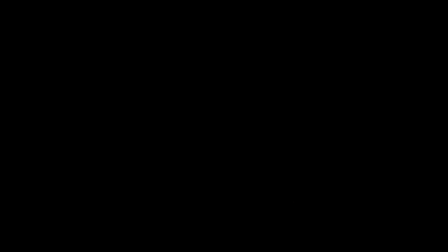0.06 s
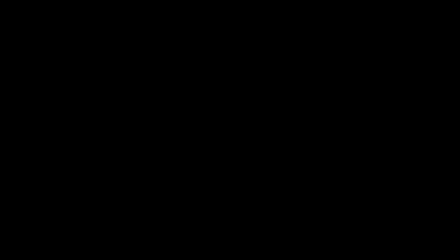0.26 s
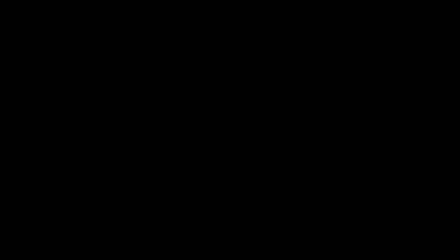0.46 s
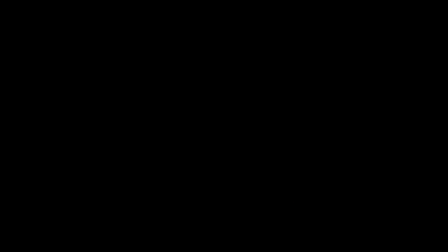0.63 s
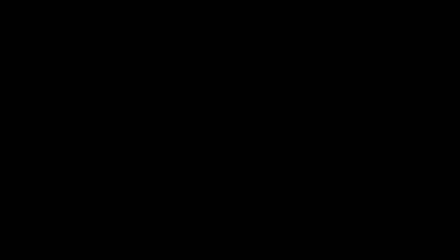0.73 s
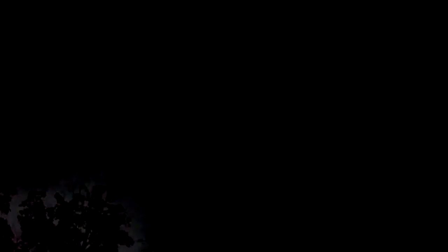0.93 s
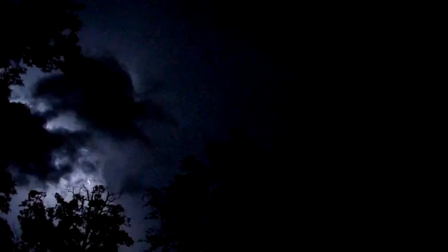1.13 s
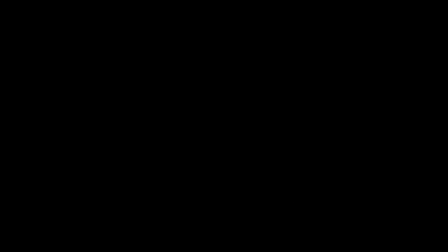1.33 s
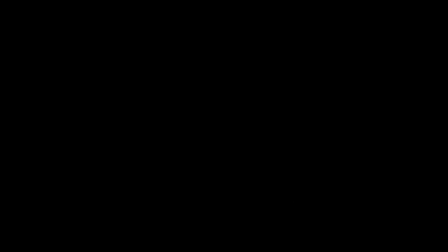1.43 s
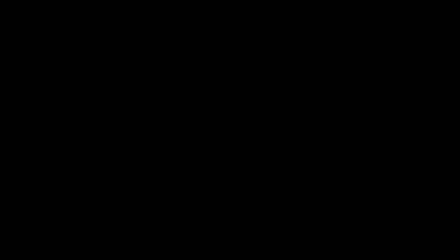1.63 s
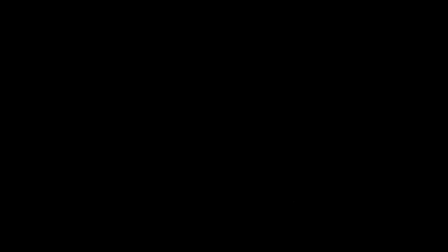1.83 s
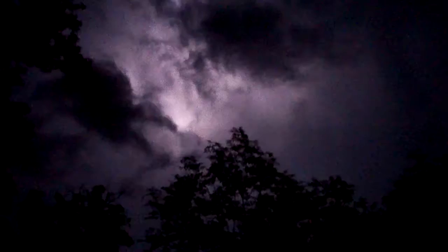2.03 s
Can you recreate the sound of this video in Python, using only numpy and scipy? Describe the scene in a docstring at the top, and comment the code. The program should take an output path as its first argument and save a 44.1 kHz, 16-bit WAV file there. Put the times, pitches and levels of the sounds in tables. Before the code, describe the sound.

Distant thunder rolls outdoors at night, swelling first deep, then slightly brighter, with dull thumps standing out before it fades. A few raindrops land close to the microphone over a thin, steady hiss of far rain.

```python
"""Distant thunder in faint rain

Countless dull pressure waves merge into a rumble that swells twice, first deep, then brighter,
with single thumps standing out. A few drops land close to the microphone and four tiny ticks
pass, over a thin, steady hiss of far rain and a faint hum."""
import sys
import numpy as np
from scipy import signal
from scipy.fft import rfft, irfft
from scipy.io import wavfile
from scipy.ndimage import uniform_filter1d

SR = 44100
rng = np.random.default_rng(int(sys.argv[2]) if len(sys.argv) > 2 else 0)


def int16_out(signal):
    """Quantize to a 16-bit WAV file."""
    q = np.round(np.clip(np.atleast_2d(signal).T, -1, 1) * 32767)
    wavfile.write(sys.argv[1], SR, q.astype(np.int16))


N = 91904
T = np.arange(N) / SR
BINS_HZ = np.arange(N // 2 + 1) * SR / N


def from_db(db):
    return 10 ** (np.asarray(db) / 20)


def unit_rms(x):
    return x / np.sqrt(np.mean(x ** 2) + 1e-20)


def in_time(rows):
    return np.interp(T, *np.transpose(rows))


def low_pass(x, hz):
    return signal.sosfilt(signal.cheby1(14, 0.1, hz, fs=SR, output="sos"), x)


def coloured(x, spectrum):
    """Minimum-phase filter; output rms 1."""
    hz, db = np.transpose(spectrum)
    gain_db = np.interp(np.log(np.maximum(BINS_HZ, 1)), np.log(hz), db)
    cepstrum = irfft(np.log(from_db(gain_db)), N)
    cepstrum[1:N // 2] *= 2
    cepstrum[N // 2 + 1:] = 0
    return unit_rms(irfft(rfft(x) * np.exp(rfft(cepstrum)), N))


def drift(rate_hz):
    """Smooth random wander, rms 1."""
    return unit_rms(irfft(rfft(rng.standard_normal(N)) / (1 + (BINS_HZ / rate_hz) ** 2), N))


def impulses(per_s, spread_db):
    """Random arrivals of either sign."""
    sizes = from_db(spread_db * np.minimum(rng.exponential(1, N), 4))
    return (rng.random(N) < per_s / SR) * sizes * rng.choice([-1, 1], N)


def evened(x, window_samples):
    """Flattens swells slower than the window."""
    power = uniform_filter1d(uniform_filter1d(x ** 2, window_samples), window_samples)
    return x / np.sqrt(power + 1e-12)


def burst(start_s, rise_s, t60_s):
    """Quick rise, exponential fall."""
    age_s = np.maximum(T - start_s, 0)
    return (1 - np.exp(-age_s / rise_s)) * from_db(-60 * age_s / t60_s)


def roll(pivot_hz=185):
    """Waves from all along the lightning channel, dulled by distance; bass and top see-saw."""
    # (time [s], level before tilt [dB])
    swells = [(0, -45), (.07, -49.5), (.115, -40.5), (.17, -45.5), (.31, -52), (.42, -46), (.51, -44.5),
              (.56, -39.5), (.68, -41.5), (.8, -45), (.92, -44.5), (.98, -43), (1.11, -43), (1.29, -40.5),
              (1.42, -40.5), (1.48, -46), (1.66, -43), (1.79, -53), (2.08, -64.5)]
    # (time [s], tilt about the pivot [dB/octave])
    brightness = [(0, 0), (.12, -4.4), (.36, 0.8), (.66, -4), (.9, -.5), (1.25, -0.3), (1.65, -0.6),
                  (2.08, 6.5)]
    # (frequency [Hz], relative level [dB])
    spectrum = [(30, -37.5), (50, -31), (78, -8), (100, -9.5), (120, -2), (148, -9), (185, 2.5), (250, -4),
                (300, -3), (390, -7.5), (500, -17), (700, -24.5), (1200, -46), (2000, -63.5)]
    waves = coloured(impulses(per_s=900, spread_db=2), spectrum)
    wave_bins = rfft(evened(waves, window_samples=1800))
    octaves = np.clip(np.log2(np.maximum(BINS_HZ, 1) / pivot_hz), -2, 2)
    tilt_db = in_time(brightness)
    rumble = np.zeros(N)
    for octave in range(-2, 3):
        band = irfft(wave_bins * np.maximum(1 - abs(octaves - octave), 0), N)
        rumble += band * from_db(tilt_db * octave)
    return from_db(in_time(swells)) * rumble


def thumps(echo_db=-17.5, echo_t60_s=0.07):
    """N-shaped pressure waves, rounded by distance and trailed by scattered echoes."""
    # (time [s], peak [dB], 1 / N-wave length [Hz])
    arrivals = [(0.105, -46, 87.6), (.126, -37, 175), (.539, -28.5, 160), (0.564, -36, 188),
                (0.618, -26, 190), (.633, -28, 132), (.655, -34.5, 118), (.674, -29.5, 172),
                (.702, -33.5, 169), (.729, -30.5, 98.8), (.740, -35, 84.3), (.970, -35.5, 199),
                (1.030, -32, 133), (1.167, -41.5, 236), (1.264, -36.5, 172), (1.281, -28, 170),
                (1.297, -31.5, 215), (1.387, -36.5, 192), (1.404, -32, 190), (1.442, -36.5, 151)]
    # loss to distance and ground: (frequency [Hz], relative gain [dB])
    path_gain = [(25, -30), (50, -24.5), (80, -2), (190, 3), (320, 3.5), (430, -5.5), (600, -21.5),
                 (1200, -36.5), (2500, -58.5)]
    out = np.zeros(N)
    for start_s, peak_db, hz in arrivals:
        n_wave = (1 - 2 * T * hz) * (T * hz < 1)
        rounded = coloured(n_wave, path_gain)[:N // 20]
        echo_decay = (T > start_s) * from_db(echo_db - 60 * abs(T - start_s) / echo_t60_s)
        paths = impulses(per_s=200, spread_db=0) * echo_decay
        paths[int(start_s * SR)] = 1  # direct path
        out += from_db(peak_db) * signal.oaconvolve(paths, rounded / abs(rounded).max())[:N]
    return out


def drops(grains_per_s=5600):
    """Each near drop lands with a dull pat and a shorter, bright splash."""
    # (time [s], pat level [dB], splash level [dB], rise [s])
    landings = [(.321, -53.5, -78, .002), (.351, -46, -51, 0.00086), (0.364, -57, -70, 0.0018),
                (0.474, -48.5, -60, .005), (0.609, -73, -55, 0.0024), (.627, -69, -59, .002),
                (0.646, -63, -62, .002), (1.438, -49.5, -66, 0.004), (1.6244, -45.5, -53, .0004),
                (1.986, -73, -55, .002), (1.999, -72, -61.5, 0.0024), (2.054, -54, -68, 0.0027)]
    # both: (frequency [Hz], relative level [dB])
    pat_spectrum = [(250, -4), (600, 5.5), (1000, 4), (1600, -0.5), (2800, -8.5), (4000, -22),
                    (5500, -45.5)]
    splash_spectrum = [(3500, -35.5), (4400, -15), (5300, 2.5), (6800, 7), (8200, -4.5), (9600, -17)]
    pat_envelope, splash_envelope = np.zeros((2, N))
    for start_s, pat_db, splash_db, rise_s in landings:
        pat_envelope += from_db(pat_db) * burst(start_s, rise_s, t60_s=0.092)
        splash_envelope += from_db(splash_db) * burst(start_s, rise_s, t60_s=0.057)
    pat = pat_envelope * coloured(impulses(grains_per_s, spread_db=0.85), pat_spectrum)
    splash = splash_envelope * coloured(impulses(grains_per_s, spread_db=0.73), splash_spectrum)
    return pat + splash


def ticks(band_hz=(6860, 8200), rise_s=0.00078, t60_s=0.012):
    """Four tiny, thin ticks in quick succession."""
    # (time [s], level [dB])
    onsets = [(0.455, -57), (.467, -54), (0.478, -58), (.502, -55)]
    envelope = sum(from_db(db) * burst(start_s, rise_s, t60_s) for start_s, db in onsets)
    band_pass = signal.butter(2, band_hz, "band", fs=SR, output="sos")
    return envelope * unit_rms(signal.sosfilt(band_pass, rng.standard_normal(N)))


def drizzle(hiss_db=-56.5, flicker_db=0.9, droplets_db=-63.5):
    """Far rain and night air: a smooth hiss with tiny droplets ticking in it."""
    # (frequency [Hz], relative level [dB])
    spectrum = [(25, -5.5), (70, 6.5), (200, 4), (400, 8.5), (650, 1.5), (950, 2), (1500, -4), (2600, -9.5),
                (3400, -15.5), (4200, -26), (5100, -15.5), (6000, -11), (7100, -10.5), (8300, -17),
                (9200, -30), (10000, -40)]
    envelope = from_db(hiss_db + flicker_db * drift(rate_hz=10))
    hiss = envelope * coloured(rng.standard_normal(N), spectrum)
    droplets = from_db(droplets_db) * coloured(impulses(per_s=200, spread_db=2), spectrum)
    return hiss + droplets


def hum(pitch_hz=122.3, rms_db=-63, waver_rad=0.2):
    """A faint, slightly wavering low tone."""
    phase = 2 * np.pi * pitch_hz * T + waver_rad * drift(rate_hz=1)
    return from_db(rms_db) * np.sqrt(2) * np.sin(phase)


def scene():
    return (roll() + thumps() + drops() + ticks() + drizzle() + hum())[None]


def record(dry, noise_db=-90):
    """The microphone passes little top; the recorder adds a trace of even noise."""
    microphone = low_pass(dry, hz=9500)
    self_noise = from_db(noise_db) * rng.standard_normal(N)
    return low_pass(microphone + self_noise, hz=15700)


dry = scene()
out = record(dry)
int16_out(out)
```